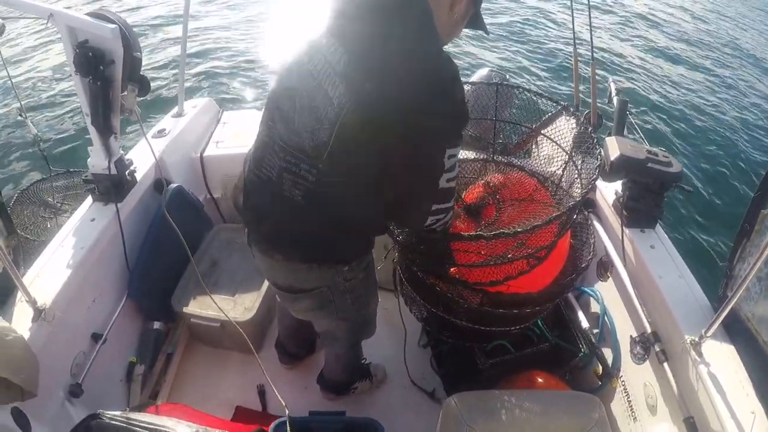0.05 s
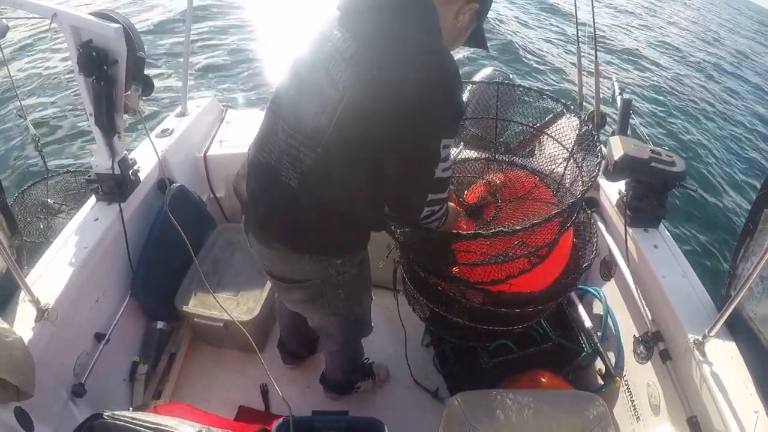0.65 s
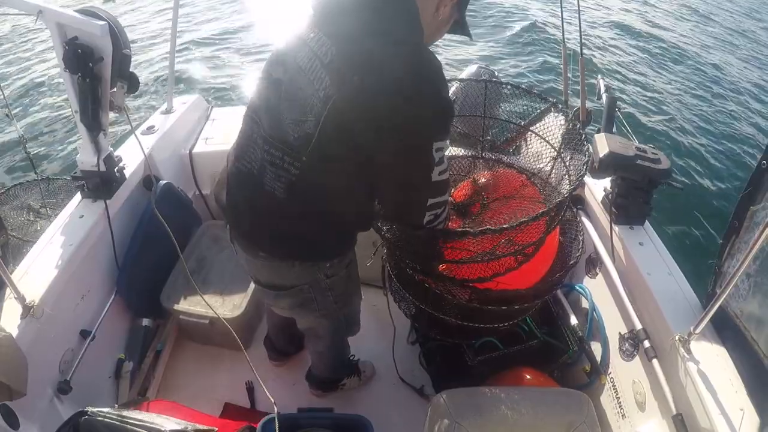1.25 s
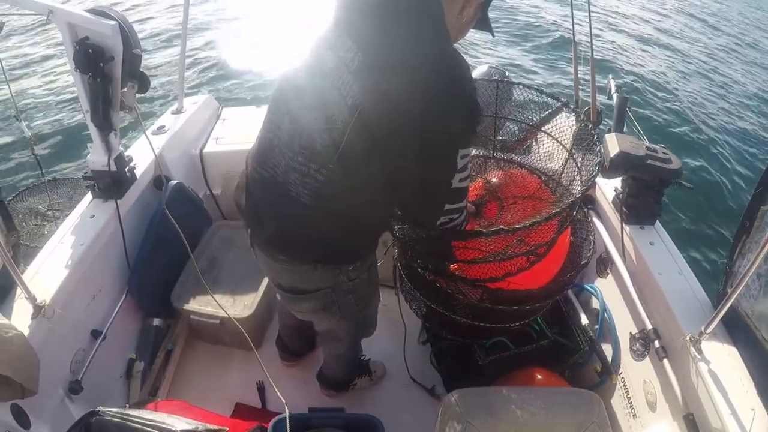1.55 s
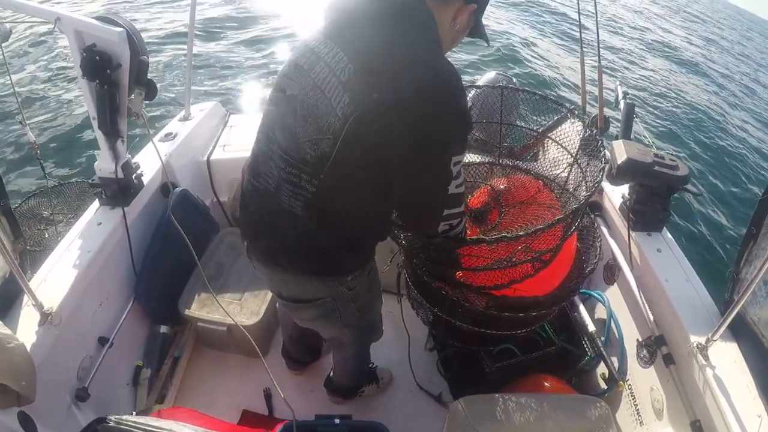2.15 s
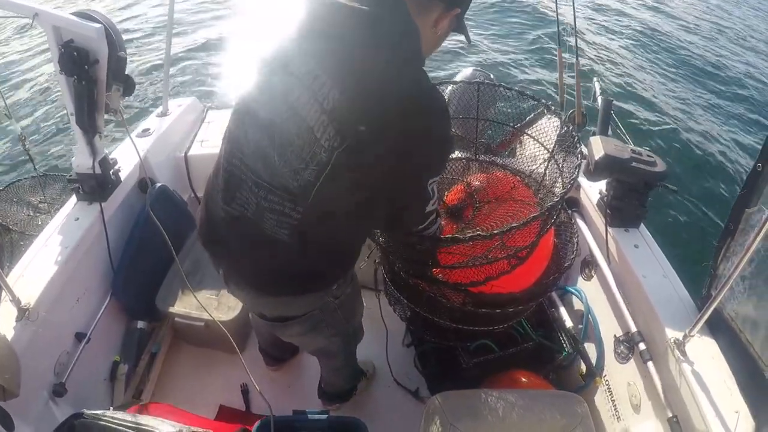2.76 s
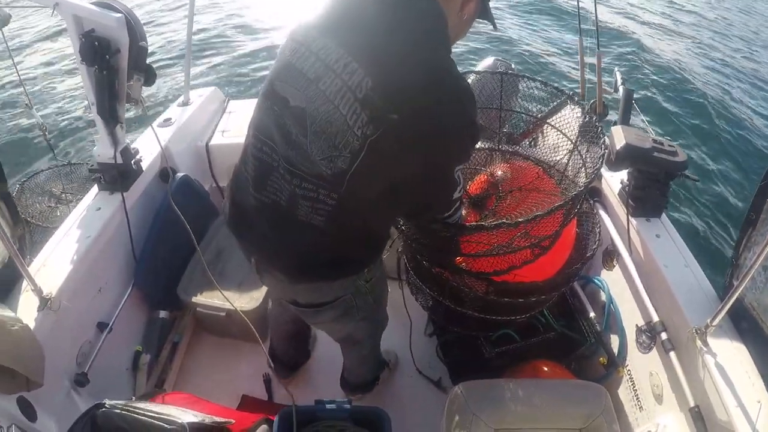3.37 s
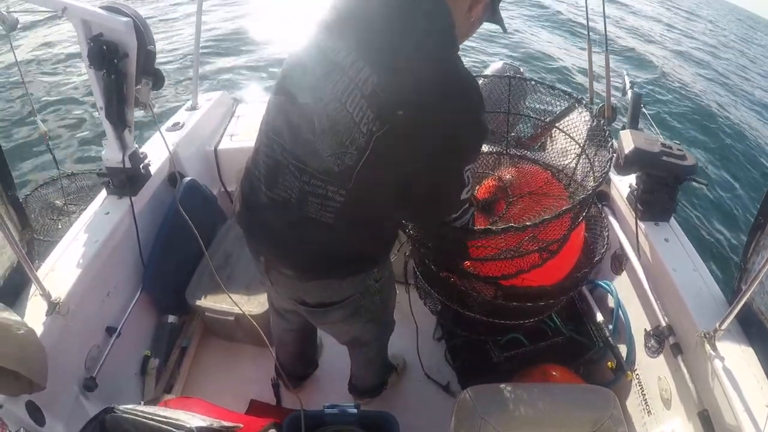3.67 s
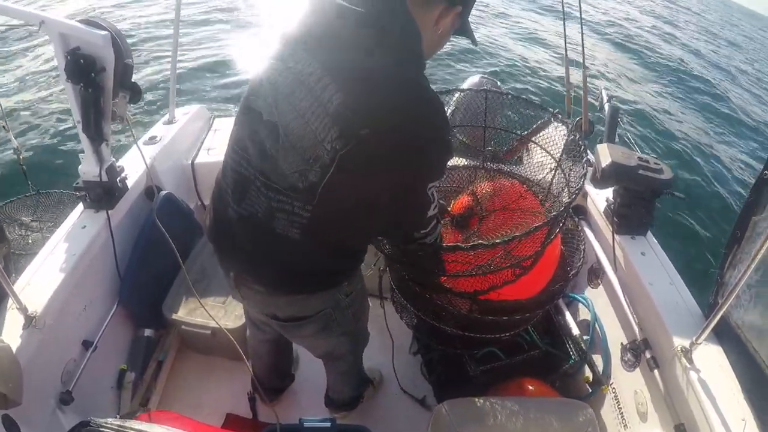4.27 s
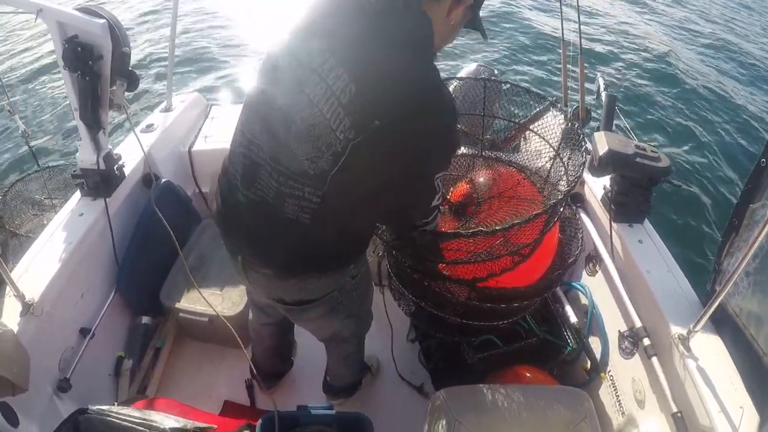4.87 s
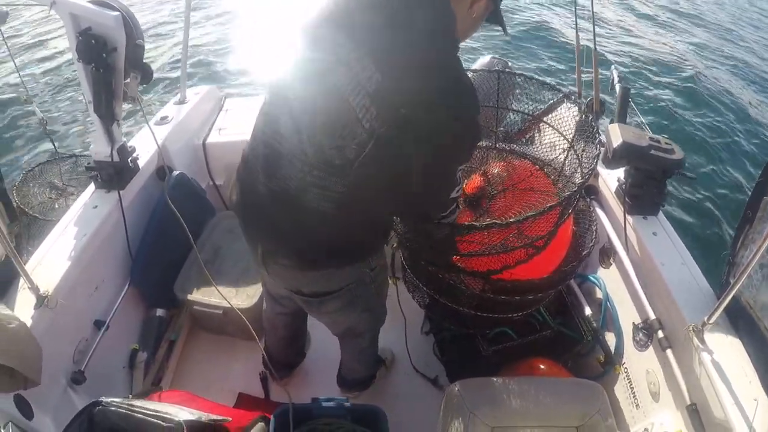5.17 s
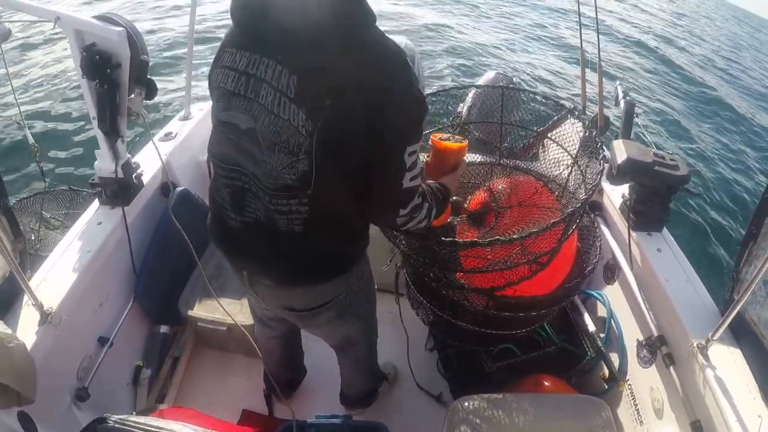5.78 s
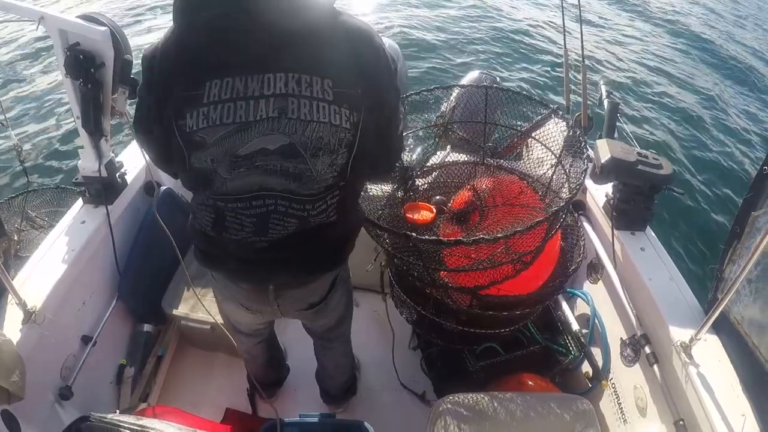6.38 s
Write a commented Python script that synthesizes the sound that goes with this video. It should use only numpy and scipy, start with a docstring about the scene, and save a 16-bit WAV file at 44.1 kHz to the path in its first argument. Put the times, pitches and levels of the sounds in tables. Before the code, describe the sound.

On a small boat in open water, a breeze rumbles on the microphone and waves make the hull drone. Water laps, hisses and plops close by while wire-mesh traps rattle and their netting ticks. The hull starts to boom, then a trap knocks hard and a hook clinks. The biggest boom and another hard knock follow, then gurgling bubbles, the hardest hollow slaps against the hull and a last faint clink.

```python
"""A small boat lies in a breeze on open water while wire-mesh prawn traps are handled at the gunwale.
From the start waves heave the hull, swelling its deep drone and a low rumble; water washes by and mesh
rattles. Wavelets slap air against the hull, bubbles plop and trap frames knock; after a second waves
begin to boom the hull. A hard knock and a hook's clink come just after 2 s, the biggest boom and knock
near 4 s, then a gurgle of bubbles, the hardest slaps at 5.5 s and a last faint clink."""
import sys
import numpy as np
from scipy import signal
from scipy.fft import rfft, irfft, next_fast_len
from scipy.io import wavfile
from scipy.ndimage import uniform_filter1d

SR = 44100
rng = np.random.default_rng(int(sys.argv[2]) if len(sys.argv) > 2 else 0)


def digitize_waveform(pressure):
    """Quantize a signal to 16-bit integers and store it at the path in sys.argv[1].

    Rows of a 2-D input are taken as channels; values are limited to [-1, 1].
    """
    field = np.atleast_2d(pressure).T
    bounded = np.clip(field, -1, 1)
    quanta = np.round(bounded * 32767).astype(np.int16)
    wavfile.write(sys.argv[1], SR, quanta)


N = 283563
TIME = np.arange(N) / SR
AGE = TIME[:SR // 2]  # seconds into a single event


def from_db(db):
    """Decibels to gain."""
    return 10 ** (np.asarray(db) / 20)


def together_db(levels_db):
    """Level of unrelated sounds heard together."""
    return 10 * np.log10(sum(from_db(db) ** 2 for db in levels_db) + 1e-20)


def rms_one(x):
    """Scale to rms 1."""
    return x / np.sqrt(np.mean(x ** 2) + 1e-20)


def peak_one(x):
    """Scale to peak 1."""
    return x / (np.abs(x).max() + 1e-20)


def at_hz(points, hz):
    """Read a curve on a log-frequency axis."""
    freqs, values = np.transpose(points)
    return np.interp(np.log(hz + 1e-3), np.log(freqs), values)


def drift(per_s):
    """A random wander with rms 1."""
    knots = rng.standard_normal(4000)
    return rms_one(np.interp(TIME * per_s, np.arange(len(knots)), knots))


def add(track, start_s, sound):
    """Mix a sound in from start_s."""
    i = min(max(int(start_s * SR), 0), N)
    track[..., i:i + sound.shape[-1]] += sound[..., :N - i]


def attack(rise_s):
    """A soft onset that rises from 0 towards 1."""
    return 1 - np.exp(-AGE / rise_s)


def ring(hz, t60):
    """A struck mode: a dying sine, gone within half a second."""
    return np.sin(2 * np.pi * hz * AGE) * from_db(-60 * AGE / t60) * np.cos(np.pi * AGE)


def resonate(x, hz, t60):
    """A resonance with gain 1 at its peak."""
    r = from_db(-60 / (t60 * SR))
    feedback = [1, -2 * r * np.cos(2 * np.pi * hz / SR), r * r]
    return signal.lfilter(np.array([1, 0, -1]) * (1 - r * r) / 2, feedback, x + 1e-18)


def bubble(hz, cycles, glide):
    """A bubble rings for some cycles and rises in pitch as it nears the surface."""
    life = AGE[:SR // 16] * hz / cycles
    return np.sin(2 * np.pi * cycles * life * (1 + glide * life)) * from_db(-60 * life)


def grains(size, per_s, spread_db):
    """Two streams of random clicks of uneven strength; rms 1."""
    shape = (2, size)
    clicks = (rng.random(shape) < per_s / SR) * rng.choice([-1, 1], shape)
    return rms_one(clicks * from_db(spread_db * np.minimum(rng.exponential(1, shape), 4)))


def diffuse(pair, spectrum):
    """Colour two unrelated noises and blend them into sound that comes from all around; rms 1."""
    # likeness of the microphone's two ports: freq_hz, correlation
    likeness = [(30, 0), (130, 0.06), (290, -0.15), (630, -0.6), (1370, -0.18), (2000, 0.06), (3000, .5),
                (4500, 0.58), (6500, 0), (14000, -0.08)]
    size = next_fast_len(pair.shape[-1])
    hz = np.fft.rfftfreq(size, 1 / SR)
    skirts = np.minimum(hz / spectrum[0][0], 1) ** 2 / np.maximum(hz / spectrum[-1][0], 1) ** 3
    mid, side = rfft(pair, size) * from_db(at_hz(spectrum, hz)) * skirts
    alike = at_hz(likeness, hz)
    ports = np.sqrt(1 + alike) * mid + np.sqrt(1 - alike) * side * [[1], [-1]]
    return rms_one(irfft(ports, size)[:, :pair.shape[-1]])


def from_deck(x):
    """A near source reaches the left port later than the right."""
    # lag at the left port: freq_hz, phase_rad
    port_lag = [(40, 0.5), (130, 1.6), (300, 2.32), (700, 2.42), (1400, 1.67), (2000, 1.1), (4500, .2)]
    size = next_fast_len(N + SR)
    lag = at_hz(port_lag, np.fft.rfftfreq(size, 1 / SR))
    left = irfft(rfft(x, size) * np.exp(-1j * lag), size)[:N]
    return np.array([left, x])


def heave_levels(attack_s, breeze_db, drone_rest_db):
    """Each heave of the hull comes quickly, holds and dies away: dB envelopes for rumble and drone."""
    # waves heaving the hull: start_s, hold_s, rumble_db, drone_db, release_db_per_s
    heaves = [(0.0, 0.022, -36.5, -32, 37), (0.336, 0.12, -44, -28.5, 65), (0.96, 0.11, -57, -36, 82),
              (1.136, 0.088, -36.5, -23.5, 43), (1.504, 0.59, -41, -31.5, 84), (2.214, 0.38, -39, -26, 72),
              (2.76, 0.22, -32.5, -21, 117), (3, 0.13, -25.5, -25.5, 230), (3.216, 0.38, -30, -28, 79),
              (3.676, 0.19, -34.5, -27.5, 78), (4.034, 0.12, -37, -22, 40), (4.581, 0.12, -28, -35, 39),
              (4.866, 0.31, -29.5, -24, 82), (5.226, 0.41, -36, -27, 88), (5.79, 0.091, -36.5, -32.5, 51),
              (6.276, 0.044, -34, -40, 77)]
    rumble, drone = [breeze_db], [drone_rest_db]
    for start, hold, rumble_db, drone_db, release in heaves:
        onset_db = 20 * np.log10(np.clip((TIME - start) / attack_s, 1e-6, 1))
        shape_db = onset_db - release * np.maximum(TIME - start - hold, 0)
        rumble.append(rumble_db + shape_db)
        drone.append(drone_db + shape_db)
    return together_db(rumble), together_db(drone)


def low_rumble(rumble_db, lumps_db):
    """A lumpy low rumble swells over the steady breeze as waves heave the hull."""
    # colour of the rumble: freq_hz, level_db
    colour = [(15, -16), (24, 14), (35, -2.5), (55, 5.5), (100, -14), (200, -12.5), (500, -101)]
    return from_db(rumble_db + lumps_db * drift(25)) * diffuse(rng.standard_normal((2, N)), colour)


def hull_drone(drone_db, hz, t60):
    """Restless water pushes slowly on the hull and keeps one deep mode sounding."""
    push = signal.sosfilt(signal.butter(3, 200, fs=SR, output="sos"), rng.standard_normal((2, N)))
    tone = signal.hilbert(resonate(push, hz, t60), next_fast_len(N))[:, :N]
    envelope = np.sqrt(np.abs(uniform_filter1d(np.abs(tone) ** 2, SR // 30)) + 1e-12)
    return from_db(drone_db) * rms_one(tone.real / envelope)  # evened out, so the heaves set its level


def swell(crest_s, db, rise_db_per_s=61.5, fall_db_per_s=45):
    """Level of one swell: it builds to its crest and drains more slowly."""
    return db - np.maximum(rise_db_per_s * (crest_s - TIME), fall_db_per_s * (TIME - crest_s))


def water_levels(lapping_rest_db, wash_rest_db, spray_rest_db, spray_lag_s, lull_width_s):
    """dB envelopes for lapping, wash and spray; ripples break just after each crest and sink in lulls."""
    # swells running along the side: crest_s, lapping_db, wash_db, spray_db
    swells = [(1.321, -57, -44, -65), (1.651, -30.5, -45.5, -48), (1.87, -36.5, -50.5, -60),
              (2.311, -33, -50.5, -66), (3.062, -41.5, -45.5, -55), (3.4, -67, -54.5, -56.5),
              (4.169, -35, -50, -70), (4.64, -30, -50, -82), (4.862, -40, -48.5, -51),
              (5.12, -36.5, -45.5, -50), (5.329, -64, -46.5, -49.5), (5.56, -39.5, -48.5, -72),
              (5.88, -47, -54.5, -52.5), (6.43, -36.5, -43, -55)]
    # moments of slack water: centre_s, spray_dip_db
    lulls = [(0.69, -4), (1.0, -2), (2.059, -3.5), (2.71, -2.5), (4.0, -4.5), (4.38, -0.5), (4.808, -4.5),
             (6.02, -4), (6.178, -3)]
    slack_db = sum(db * np.exp(-((TIME - s) / lull_width_s) ** 2) for s, db in lulls)
    lapping_db = together_db([lapping_rest_db] + [swell(s, db) for s, db, _, _ in swells])
    wash_db = together_db([wash_rest_db] + [swell(s, db) for s, _, db, _ in swells])
    ripples = [swell(s + spray_lag_s, db, rise_db_per_s=107) for s, _, _, db in swells]
    spray_db = together_db([spray_rest_db] + ripples)
    return lapping_db, wash_db + 0.34 * slack_db, spray_db + slack_db


def lapping(lapping_db, flutter_db):
    """Water laps along the side as a low, fluttering noise."""
    # colour of the lapping: freq_hz, level_db
    colour = [(90, 10.5), (125, -3), (170, 9.5), (270, 0.5), (350, -6.5), (460, -21), (800, -19)]
    return from_db(lapping_db + flutter_db * drift(30)) * diffuse(rng.standard_normal((2, N)), colour)


def wash(wash_db, churn_db, flutter_db, count):
    """Crowds of small bubbles gurgle on a bed of churning noise."""
    # colour of the wash: freq_hz, level_db
    colour = [(280, -5), (430, 11.5), (600, 5.5), (780, 5.5), (960, -3), (1500, -5.5), (2300, -8),
              (3500, -12.5), (5500, -20)]
    fizz = np.zeros((2, N))
    for k, (when, smallness, strength) in enumerate(rng.random((count, 3))):
        # large bubbles are rarer and softer, small ones last more cycles
        hz = 450 * 11 ** (smallness ** .7)
        gain = from_db(15 * strength ** 3 + 6 * smallness)
        add(fizz[k % 2], when * N / SR, gain * bubble(hz, cycles=.9 * np.sqrt(hz), glide=.08))
    churn = from_db(churn_db) * rng.standard_normal((2, N)) + rms_one(fizz)
    return from_db(wash_db + flutter_db * drift(30)) * diffuse(churn, colour)


def spray(spray_db, drops_db, flutter_db):
    """Breaking ripples hiss, with a fine patter of drops."""
    # colour of the hiss: freq_hz, level_db
    colour = [(900, 10.5), (1800, 6.5), (2600, 2), (3500, 2.5), (4900, -6), (6200, 3.5), (7300, 3),
              (8400, -3.5), (10000, -5), (11800, -15), (14000, -22)]
    patter = rng.standard_normal((2, N)) + from_db(drops_db) * grains(N, per_s=600, spread_db=1.4)
    return from_db(spray_db + flutter_db * drift(70)) * diffuse(patter, colour)


def mesh_rattles(rise_s, catch_s, body_share):
    """Wires catch and slip in dying showers of ticks; shakes move the low wires, scrapes are crisper."""
    # mesh shaken or scraped: start_s, drag_s, level_db, body_db (scaled by body_share), t60_s, crisp_db
    shakes = [(0.001, .025, -33, -12, 0.11, 13), (0.178, .01, -40, -1, 0.34, 6),
              (0.337, 0.03, -41.5, -8, 0.15, -5), (0.401, .01, -38.5, -4, 0.12, 3),
              (0.768, .01, -37, -4, 0.34, 8), (1.2616, .01, -38.5, -1, 0.16, 2),
              (1.377, .08, -37.5, -4, 0.18, 6.5), (2.252, .01, -39, -6, 0.046, -6),
              (2.305, .025, -41.5, -18, 0.22, 6), (3.346, 0.012, -43.5, -7, 0.57, 5),
              (4.975, .01, -40, -0.5, 0.64, -2), (5.513, .01, -39.5, -4.5, 0.61, -16),
              (5.825, .06, -36, -7.5, 0.083, 12.5), (6.12, .01, -38, -18, 0.087, 5),
              (6.379, .025, -40, -9, 0.14, -2)]
    # colour of the wire mesh: freq_hz, level_db
    mesh = [(1000, 17.5), (2000, 14.5), (3400, 15.5), (4900, 2.5), (6300, 12), (7400, 13), (8500, -4),
            (10500, -12.5), (14000, -27)]
    out = np.zeros((2, N))
    for start, drag_s, db, body_db, t60, crisp_db in shakes:
        colour = [(hz, level + body_share * body_db * (hz < 4500) + crisp_db * (hz > 8000))
                  for hz, level in mesh]
        since_catch = AGE - catch_s * (np.minimum(AGE, drag_s) // catch_s)
        envelope = peak_one(attack(rise_s) * from_db(-60 * since_catch / t60))
        shower = diffuse(grains(len(AGE), per_s=3700, spread_db=-0.5), colour)
        add(out, start, from_db(db) * envelope * shower)
    return out


def crackle(spray_db, count, low_hz=3200, high_hz=7600):
    """Wet net and drops tick faintly at random, near the spray's level: start_s, level_db, pitch_hz."""
    when, height, strength = rng.random((count, 3)).T
    hz = low_hz * (high_hz / low_hz) ** np.sqrt(height)
    db = spray_db[(when * N).astype(int)] - 2 + 6 * strength
    return list(zip(when * N / SR, db, hz))


def net_ticks(faint_ticks, t60):
    """Strands of net snap over the frame, each a tiny burst of noise around its own pitch."""
    # the distinct snaps: start_s, level_db, pitch_hz
    snaps = [(0.021, -30.5, 7450), (0.069, -40, 2600), (0.165, -46, 6500), (0.19, -38, 2900),
             (0.371, -42, 2700), (0.353, -35.5, 6850), (0.926, -45, 6500), (1.267, -48, 5960),
             (2.33, -34, 6900), (2.414, -43.5, 4140), (2.44, -46, 5230), (2.595, -45, 6500),
             (2.809, -43, 6500), (2.9, -43, 6200), (2.924, -43, 3950), (3.077, -41, 6330),
             (3.835, -42, 6400), (4.117, -44, 6000), (4.288, -49, 4530), (4.437, -46, 6000),
             (4.525, -43, 6800), (4.535, -42, 6900), (4.657, -44, 7100), (4.698, -46, 6640),
             (5.364, -43, 6800), (5.374, -37, 6740), (5.842, -31.5, 7600), (5.882, -39, 7100),
             (5.94, -45.5, 5800), (6.1, -52, 5000), (6.233, -40, 5570), (6.383, -32.5, 6140)]
    # colour of a tick: pitch_ratio, level_db
    tick_colour = [(.4, -28), (.8, -7), (1, 11), (1.2, -7), (1.9, -25)]
    out, age = np.zeros((2, N)), AGE[:SR // 20]
    for start, db, hz in snaps + faint_ticks:
        colour = [(hz * ratio, level) for ratio, level in tick_colour]
        burst = diffuse(rng.standard_normal((2, len(age))), colour)
        add(out, start, from_db(db - 60 * age / t60) * burst)
    return out


def hull_slaps(rise_s, panel_db, splat_db, splat_t60, rebound_s, rebound_db, rebound_ratio):
    """An air pocket throbs under each wavelet and sets the hull panels ringing; water splats round it."""
    # wavelets trapping air against the hull: start_s, level_db, pitch_hz, t60_s, relative_splat_db
    wavelets = [(0.104, -22, 198, 0.13, -12.5), (0.418, -12, 187, 0.036, -33),
                (0.552, -14.5, 204.4, 0.23, -26), (1.038, -24, 188, 0.17, -38),
                (1.127, -8, 237, 0.089, -20.5), (1.245, -14, 194, 0.042, -11.5), (1.408, -28, 391, .05, -5),
                (1.55, -13.5, 202, .03, -11), (1.585, -17, 307, 0.028, -20),
                (1.648, -11.5, 220, 0.028, -14), (1.691, -15.5, 203, 0.03, -33),
                (2.085, -25, 226, 0.13, -4), (2.225, -10.5, 188, 0.069, -36), (2.361, -16, 195, 0.035, -43),
                (2.762, -17, 240, 0.066, -10.5), (2.992, -17.5, 185, 0.092, -14),
                (3.531, -21, 193, 0.02, -24), (3.859, -21.5, 320, 0.084, -16), (4.082, -7, 204, 0.084, -24),
                (4.145, -10, 205, 0.039, -34), (4.775, -27, 310, 0.037, -16),
                (5.075, -15, 240, 0.019, -3.5), (5.091, -9, 202.4, 0.13, -15),
                (5.148, -18, 164, 0.038, -6.5), (5.251, -16, 273, 0.024, -14),
                (5.525, -3.5, 307, 0.04, -10.5), (5.536, -1, 221.4, 0.07, -16), (5.857, -19, 201, 0.11, -6),
                (5.915, -26.5, 152, .1, -14), (6.39, -24.5, 268, 0.12, -6)]
    # modes of the hull panels: pitch_hz, level_db, t60_s
    panel_modes = [(160, -2.5, 0.071), (178.8, 2.5, 0.15), (209.7, -3.5, 0.3), (277.6, 10.5, 0.27),
                   (329, -9.5, 0.1), (400, 4, 0.11)]
    # colour of water hitting the hull: freq_hz, level_db
    splat_colour = [(150, -48), (260, 5.5), (330, -3.5), (430, -11.5), (700, -19.5), (1200, -33),
                    (3000, -60)]
    pockets, splats = np.zeros(N), np.zeros((2, N))
    onset = attack(rise_s)
    splat_envelope = peak_one(onset * from_db(-60 * AGE / splat_t60))
    for start, db, hz, t60, wet_db in wavelets:
        add(pockets, start, from_db(db) * peak_one(ring(hz, t60) * onset))
        rebound = peak_one(ring(hz * rebound_ratio, t60) * onset)  # the water falls back once
        add(pockets, start + rebound_s, from_db(db + rebound_db) * rebound)
        splat = diffuse(grains(len(AGE), per_s=3000, spread_db=0.96), splat_colour)
        add(splats, start, from_db(db + wet_db + splat_db) * splat_envelope * splat)
    panels = sum(from_db(db) * resonate(pockets, hz, t60) for hz, db, t60 in panel_modes)
    return from_deck(pockets + from_db(panel_db) * panels) + splats


def lone_bubbles(rise_s, t60, wobble_octaves):
    """Single bubbles ring, wobble and mostly glide upwards; a quick run of them makes a gurgle."""
    # bubbles that ring out clearly: start_s, level_db, pitch_hz, glide_octaves_per_s
    bubbles = [(0.283, -28.5, 700, 16), (0.307, -34.5, 985, 6), (0.326, -36, 1370, 22),
               (1.21, -37.5, 1550, 0), (1.242, -36.5, 2150, -1), (4.754, -30, 770, 2), (4.809, -28, 820, 6),
               (4.839, -27.5, 1047, 2.5), (4.882, -40, 2140, 5.5), (4.897, -22, 660, 9),
               (4.95, -28.5, 776, 3), (4.97, -27, 800, 5), (5.02, -30, 964, -3), (5.62, -35, 980, 4),
               (6.08, -43, 1940, 3), (6.228, -28.5, 814, 6)]
    out, age = np.zeros(N), AGE[:SR // 10]
    envelope = attack(rise_s)[:len(age)] * from_db(-60 * age / t60)
    for start, db, hz, glide in bubbles:
        octaves = glide * age + wobble_octaves * drift(264)[:len(age)]
        phase = 2 * np.pi * np.cumsum(hz * 2 ** octaves) / SR
        add(out, start, from_db(db) * peak_one(np.sin(phase) * envelope))
    return from_deck(out)


def small_laps(wash_db, count, low_hz=683, high_hz=2300):
    """Lesser laps come at random, denser and louder in a swell: start_s, level_db, pitch_hz."""
    jitter, height = rng.random((count, 2)).T
    flow = np.cumsum(from_db(wash_db))
    onsets = np.searchsorted(flow, flow[-1] * (np.arange(count) + jitter) / count)
    hz = low_hz * (high_hz / low_hz) ** height
    return list(zip(onsets / SR, wash_db[onsets] - 3.5, hz))


def plops(lesser_laps, spread_s, spread_octaves, count):
    """A lap of water closes over a handful of bubbles; later ones are softer and stray more in pitch."""
    # the main bubble clusters: start_s, level_db, pitch_hz
    laps = [(0.334, -40.5, 1670), (0.37, -39, 1240), (0.91, -32.5, 1100), (1.203, -31, 666),
            (1.2545, -35.5, 1810), (1.367, -34, 1200), (1.481, -33.5, 706), (1.498, -37, 1020),
            (2.25, -32.5, 2630), (2.811, -35, 1150), (3.02, -34, 630), (3.091, -31.5, 510),
            (3.128, -37, 1730), (4.076, -47, 2230), (4.142, -33.5, 1270), (4.1794, -35, 1250),
            (4.196, -39.5, 2100), (4.983, -31, 488), (5.08, -35, 463), (5.2, -41, 645),
            (5.278, -29.5, 1270), (5.3, -38, 1470), (5.318, -35.5, 2090), (5.376, -34, 1880),
            (5.512, -34, 1760), (6.215, -36.5, 2240), (6.261, -36.5, 1210), (6.29, -40, 2850),
            (6.404, -33, 1910)]
    out = np.zeros(N)
    for start, db, hz in laps + lesser_laps:
        for k, (jitter, detune) in enumerate(zip(rng.random(count), rng.standard_normal(count))):
            progress = (k + jitter) / count
            pitch_hz = hz * 2 ** (spread_octaves * detune * progress ** .5)
            plop = from_db(db - 7 * progress) * bubble(pitch_hz, cycles=22, glide=.1)
            add(out, start + spread_s * progress ** 2, plop)
    return from_deck(out)


def trap_knocks(crack_db, crack_t60):
    """Each blow cracks, rings at a pitch set by where it lands and stirs the trap frame's modes."""
    # frames knocking on the gunwale: start_s, level_db, pitch_hz, t60_s, relative_frame_db
    blows = [(0.368, -30.5, 930, 0.022, -9), (0.907, -38, 1050, 0.035, -10), (1.124, -39, 555, 0.096, -26),
             (1.2553, -33, 1360, 0.022, -18), (1.649, -29.5, 905, 0.08, -16), (1.861, -39, 673, 0.064, -20),
             (1.908, -32.5, 890, 0.057, -8), (2.254, -17, 763, 0.036, -19), (2.4, -32, 750, 0.078, -17),
             (2.536, -37, 914, .04, -7), (3.434, -34.5, 770, 0.068, -21), (4.047, -27, 534, .04, -8),
             (4.076, -33, 1120, 0.047, -7), (4.143, -15, 775, 0.045, -14), (4.295, -27.5, 680, 0.07, -16),
             (5.075, -24, 623, 0.05, -21), (5.277, -31, 770, 0.055, -18)]
    # modes of a trap frame: pitch_hz, level_db, t60_s
    frame_modes = [(772, 3, 0.043), (830, -4.5, 0.063), (1010, -16, 0.081), (1370, -9, 0.037),
                   (1710, -12.5, 0.02), (1790, -12.5, 0.047), (2747, -25.5, 0.074)]
    struck, cracks = np.zeros(N), np.zeros((2, N))
    for start, db, pitch_hz, blow_t60, frame_db in blows:
        frame = sum(from_db(level + 2 * rng.normal()) * ring(hz, t60) * rng.choice([-1, 1])
                    for hz, level, t60 in frame_modes)
        add(struck, start, from_db(db) * peak_one(ring(pitch_hz, blow_t60) + from_db(frame_db) * frame))
        colour = [(pitch_hz / 2, -8), (pitch_hz, 0), (pitch_hz * 1.2, -9)]
        crack = diffuse(rng.standard_normal((2, len(AGE))), colour)
        add(cracks, start, from_db(db + crack_db - 60 * AGE / crack_t60) * crack)
    return from_deck(struck) + cracks


def hull_booms(rise_s):
    """A wave shoves the whole hull, which rings in its low modes."""
    # waves that lift the hull: start_s, level_db
    waves = [(1.128, -10.5), (2.222, -9), (2.406, -10), (2.777, -4.5), (2.835, -2.5), (3.036, -7),
             (3.106, -6.5), (4.043, 0), (4.114, -9), (4.595, -6), (4.703, -7), (4.993, -8.5)]
    # modes of the whole hull and deck: pitch_hz, level_db, t60_s
    deck_modes = [(31.7, 6, 0.2), (49.6, -3, 0.11), (69.6, 8.5, 0.21), (77.7, 5, 0.9)]
    out = np.zeros(N)
    boom = peak_one(sum(from_db(db) * ring(hz, t60) for hz, db, t60 in deck_modes) * attack(rise_s))
    for start, db in waves:
        add(out, start, -from_db(db) * boom)
    return from_deck(out)


def sloshes(bubbles_per_s, spread_db, spread_octaves):
    """Churned water sheds a crowd of ringing bubbles of uneven strength that swells and fades."""
    # water sloshing into bubbles: start_s, length_s, level_db, centre_pitch_hz
    crowds = [(1.167, .55, -40, 893), (2.949, 0.2, -36, 544), (3.22, .4, -44, 1310),
              (4.79, 0.45, -35.5, 790), (5.086, 0.38, -35.5, 1780), (5.41, 0.28, -41, 1400),
              (5.831, 0.06, -37, 1420), (6.12, 0.13, -39, 1250), (6.318, 0.24, -30, 1190)]
    out = np.zeros(N)
    for start, length, db, hz in crowds:
        count = int(bubbles_per_s * length)
        for k, (jitter, height, weakness) in enumerate(rng.random((count, 3))):
            progress = (k + jitter) / count
            gain = from_db(db - spread_db * weakness) * np.sin(np.pi * progress) ** .5
            pitch_hz = hz * 2 ** (spread_octaves * (2 * height - 1))
            add(out, start + length * progress, gain * bubble(pitch_hz, cycles=24, glide=.15))
    return from_deck(out)


def hook_clinks(chatter_s, touch_loss_db, count):
    """A hook chatters on the wire: a few quick, ever weaker touches, each striking its modes anew."""
    # hooks meeting wire: start_s, level_db, pitch_ratio
    clinks = [(2.33, -33.5, 1.0), (6.382, -39.5, 1.85)]
    # modes of a small metal hook: pitch_hz, level_db, t60_s
    hook_modes = [(3290, -3, 0.022), (3440, 0, 0.028), (3630, -4, 0.018)]
    out = np.zeros(N)
    for start, db, ratio in clinks:
        for k, jitter in enumerate(rng.random(count)):
            modes = sum(from_db(level + 2 * rng.normal()) * ring(hz * ratio, t60)
                        for hz, level, t60 in hook_modes)
            touch = peak_one(modes * attack(0.0018))
            delay_s = chatter_s * (k + jitter * (k > 0)) / count
            add(out, start + delay_s, from_db(db - touch_loss_db * k) * touch)
    return from_deck(out)


def deck_echoes(x, echo_db, t60):
    """Close sides and gear scatter each sound into a brief tail."""
    tail = rng.standard_normal((2, len(AGE))) * from_db(-60 * AGE / t60) * attack(0.0061)
    tail /= np.sqrt(np.sum(tail ** 2, axis=1, keepdims=True))
    return x + from_db(echo_db) * signal.fftconvolve(x, tail, axes=1)[:, :N]


def scene():
    """Wave heaves drive the rumble and drone, swells the lapping, wash and spray; traps sound on top."""
    rumble_db, drone_db = heave_levels(attack_s=0.018, breeze_db=-54, drone_rest_db=-80)
    lapping_db, wash_db, spray_db = water_levels(
        lapping_rest_db=-43, wash_rest_db=-54, spray_rest_db=-52.5, spray_lag_s=0.11, lull_width_s=.065)
    rumble = from_db(8) * low_rumble(rumble_db, lumps_db=2)
    hull = from_db(1) * hull_drone(drone_db, hz=78.4, t60=0.52)
    hull += from_db(-5.5) * hull_booms(rise_s=0.0081)
    hull += from_db(-7.5) * hull_slaps(rise_s=0.0041, panel_db=7, splat_db=4.5, splat_t60=0.19,
                                       rebound_s=0.038, rebound_db=-11.5, rebound_ratio=0.934)
    water = from_db(6) * lapping(lapping_db, flutter_db=2)
    water += from_db(4.5) * wash(wash_db, churn_db=3, flutter_db=2.36, count=7000)
    water += from_db(2) * spray(spray_db, drops_db=-9.5, flutter_db=1.5)
    near = from_db(2) * plops(small_laps(wash_db, count=40), spread_s=.035, spread_octaves=.23, count=11)
    near += sloshes(bubbles_per_s=220, spread_db=12, spread_octaves=.75)
    near += from_db(3) * trap_knocks(crack_db=-26, crack_t60=0.1)
    near += from_db(-3.5) * lone_bubbles(rise_s=.0013, t60=.065, wobble_octaves=.09)
    near += hook_clinks(chatter_s=.018, touch_loss_db=1.5, count=5)
    near += from_db(-3) * net_ticks(crackle(spray_db, count=130), t60=0.042)
    mesh = from_db(-1.5) * mesh_rattles(rise_s=0.00091, catch_s=0.02, body_share=0.69)
    return rumble + hull + water + deck_echoes(near, echo_db=-12, t60=.1) + mesh


def record(dry):
    """The left port takes in less bass and a little more treble; the top is cut on both."""
    # tone of the left port against the right: freq_hz, gain_db
    balance = [(25, -6.5), (55, -10), (82, -14.5), (125, -14), (165, -2.5), (210, -25.5), (280, -3.5),
               (350, 0.5), (700, -0.5), (3500, -0.5), (5500, 5), (7500, 1), (9000, -2.5), (13000, 0.5)]
    size = next_fast_len(N + SR)
    left_gain = from_db(at_hz(balance, np.fft.rfftfreq(size, 1 / SR)))
    left = irfft(rfft(dry[0], size) * left_gain, size)[:N]
    top_cut = signal.ellip(10, .1, 80, 14600, fs=SR, output="sos")
    return signal.sosfilt(top_cut, [left, dry[1]])


dry = scene()
out = record(dry)
digitize_waveform(out)
```